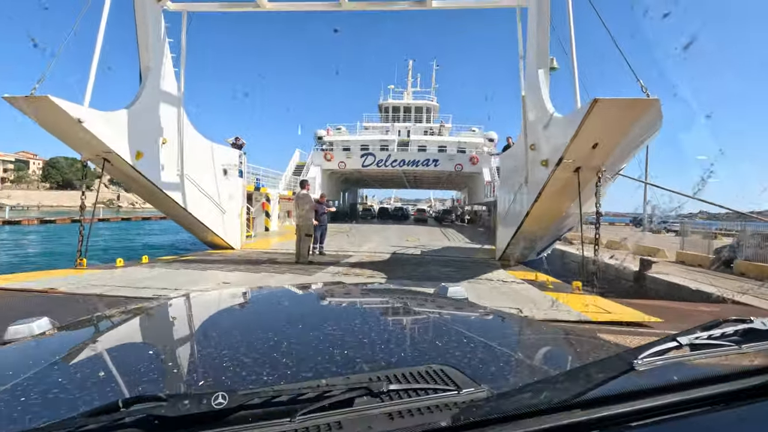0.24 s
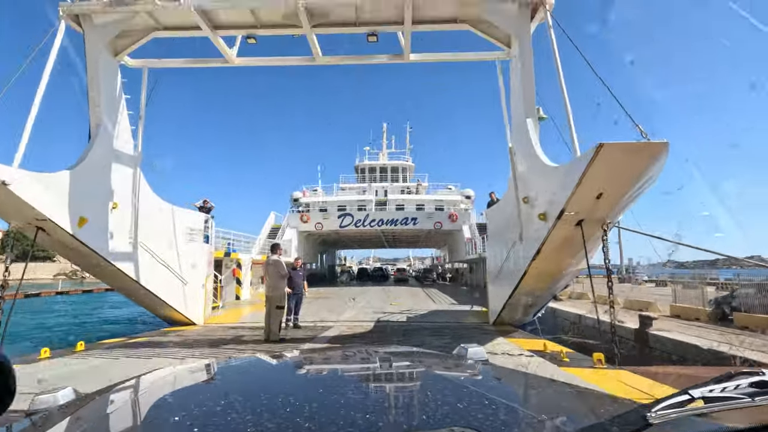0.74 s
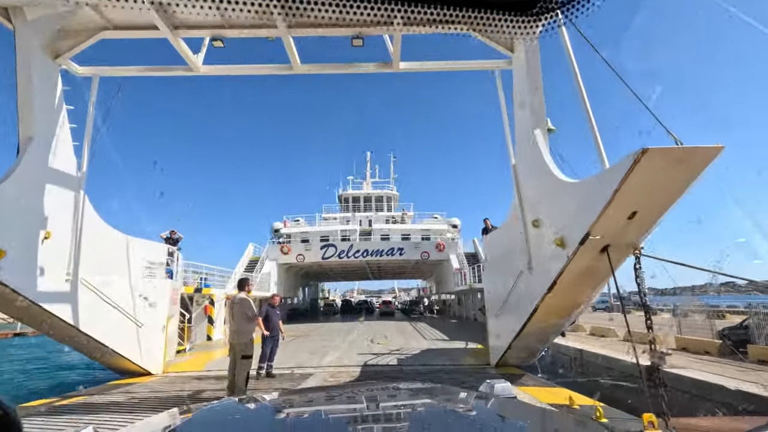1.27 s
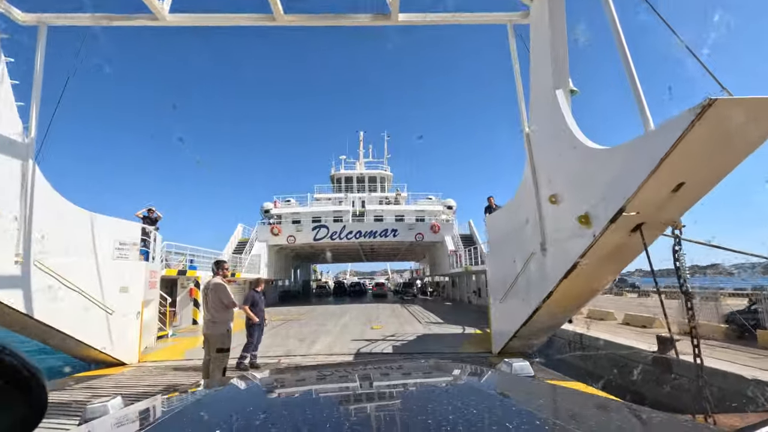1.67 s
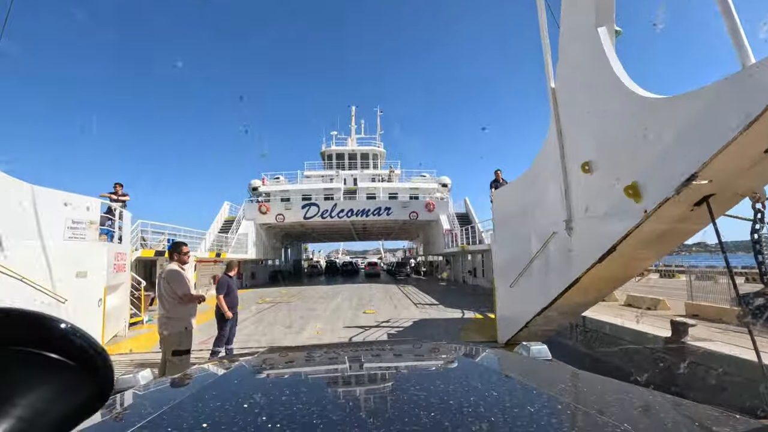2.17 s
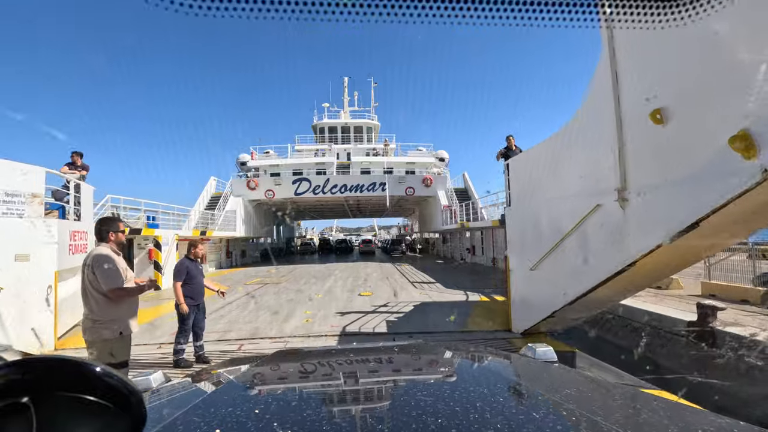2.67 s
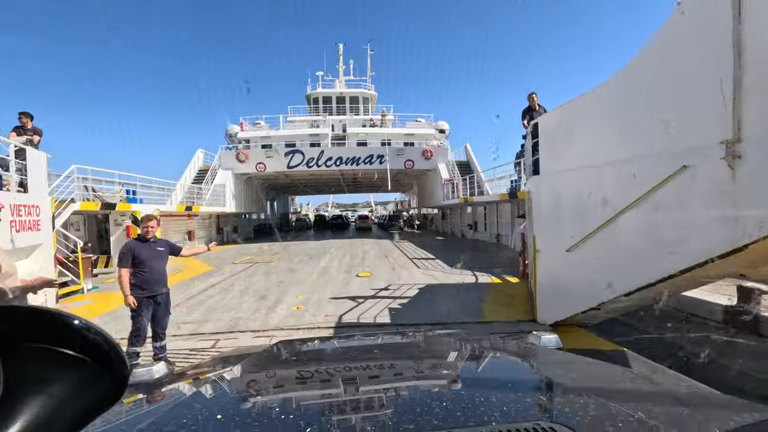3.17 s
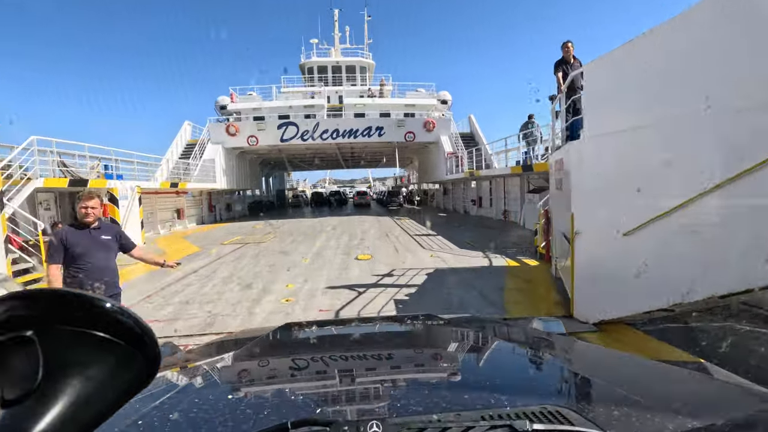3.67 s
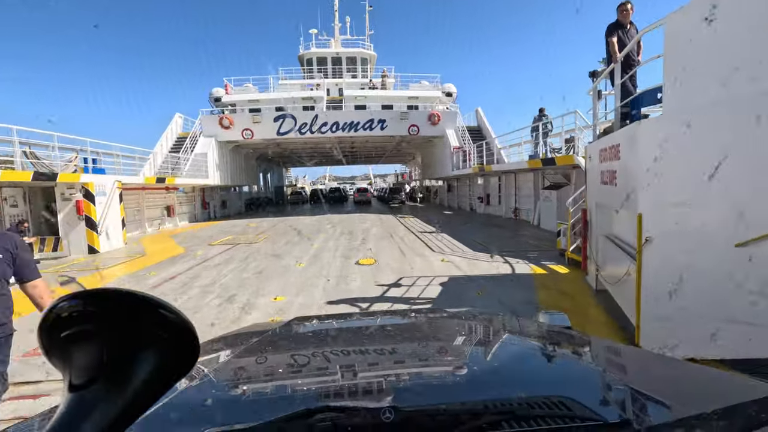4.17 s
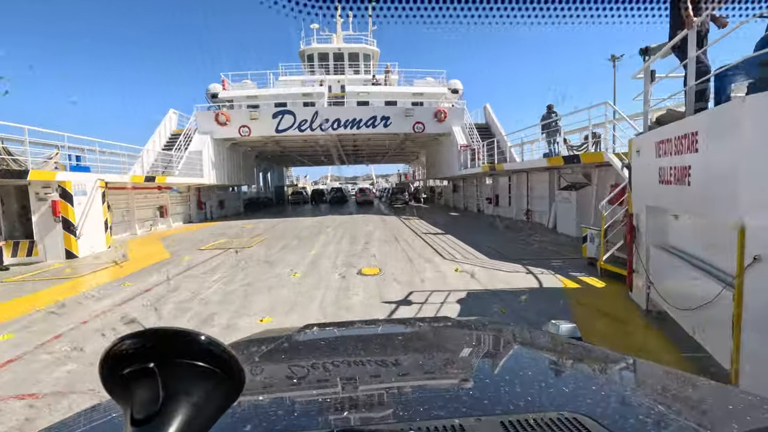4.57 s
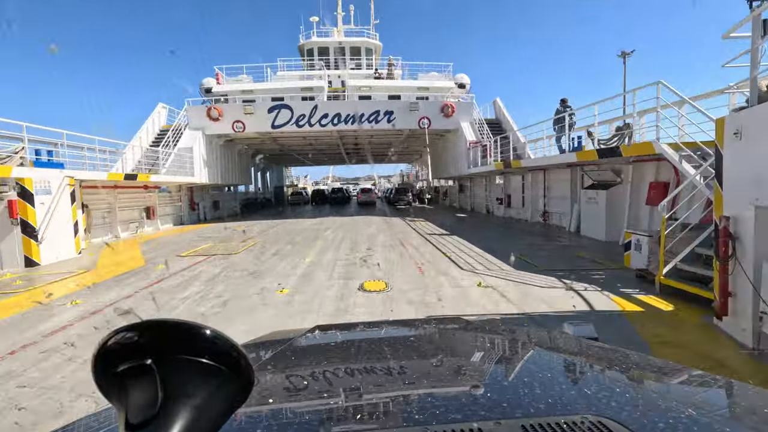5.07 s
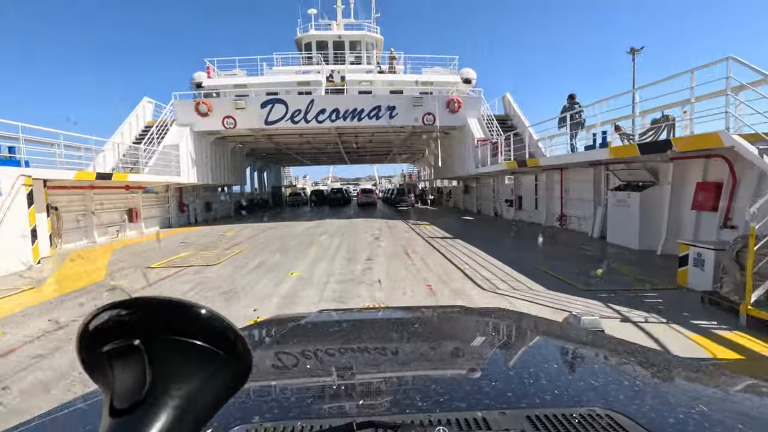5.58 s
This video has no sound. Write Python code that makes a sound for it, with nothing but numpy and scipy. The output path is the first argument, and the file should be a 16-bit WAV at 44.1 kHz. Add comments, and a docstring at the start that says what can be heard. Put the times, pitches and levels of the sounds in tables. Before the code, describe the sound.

Inside a large car at crawling speed, a deep, smooth eight-cylinder drone wavers, with a muffled rapid knock from behind the dashboard, faint tyre and fan hiss and low harbour hum. Small plastic clicks and dull thuds come at 0.2-1 s. The engine dips near 1.5 s, then surges around 2 s as the wheels meet the steel ramp: a hard boom at 2.1 s, then a tumble of bangs to 2.55 s. Engine falls towards idle by 2.8 s while thin metal sings and a loose flap lightly clanks. The heaviest, booming double bang hits at 3.3-3.4 s; bright ringing flap clanks and a high chain ping follow at 3.6 s, fading by 4.1 s. Fast, nearly even gritty ticking, with short high tones, swells at 4.5-5 s. A deck bang at 5.1 s brings rattles and a mid-pitched groan peaking at 5.3 s. Idle knocking and ship's engine hum remain, the latter rising slightly.

```python
"""First the drone and pump knock of an eight-cylinder car, heard from behind its windscreen.
It surges up a steel ramp onto a ferry deck and drops to idle: summed sine orders, noise raps on a bulkhead.
Plates bang and shudder, a loose flap clanks, trim clicks: noise bursts through resonances.
A nearly even ticking mixes grit with short tones; filtered noise makes the tyre and fan hiss and the
harbour hum; the ferry's engine is two wavering sine overtones that rise slightly in pitch late on."""
import sys
import numpy as np
from scipy import signal
from scipy.fft import rfft, irfft, next_fast_len
from scipy.io import wavfile
from scipy.ndimage import map_coordinates

SR = 44100
rng = np.random.default_rng(int(sys.argv[2]) if len(sys.argv) > 2 else 0)


def int16_out(signal):
    """Quantize to a 16-bit WAV file."""
    q = np.round(np.clip(np.atleast_2d(signal).T, -1, 1) * 32767)
    wavfile.write(sys.argv[1], SR, q.astype(np.int16))


N = 256750  # samples


def amp(db):
    """Gain of a level in dB."""
    return 10 ** (np.asarray(db) / 20)


def unit(x):
    """x at rms 1."""
    return x / np.sqrt(np.mean(x ** 2) + 1e-20)


def along(points, hz):
    """(frequency [Hz], value) points read on a log frequency axis."""
    f, v = np.transpose(points)
    return np.interp(np.log(hz + 1), np.log(f + 1), v)


def curves(rows):
    """One value per sample for each column after the time."""
    s, *cols = np.transpose(rows)
    return [np.interp(np.arange(N) / SR, s, c) for c in cols]


def wobble(rate):
    """A smooth random curve, rate knots a second."""
    knots = rng.standard_normal(int(N * rate / SR) + 4)
    return map_coordinates(knots, [np.arange(N) * rate / SR])


def filtered(x, response):
    """x times a complex response of frequency."""
    m = next_fast_len(N + SR // 2)
    spectrum = rfft(x, m) * response(np.fft.rfftfreq(m, 1 / SR))
    return irfft(spectrum, m)[..., :N]


def ringing(x, modes):
    """x through resonances of alternating sign, scaled so that white noise keeps its rms."""
    def body(f):
        """Sum of band-pass modes, each peaking at its centre."""
        return sum((-1) ** k * amp(db) * 1j * f * width / (centre ** 2 - f * f + 1j * f * width)
                   for k, (centre, width, db) in enumerate(modes))

    body_rms = np.sqrt(np.mean(np.abs(body(np.arange(SR // 2))) ** 2))
    return filtered(x, body) / body_rms


def bursts(times, dbs, t60s, attack, push_db=16.0):
    """Noise that starts just before each peak with a hard push and dies away."""
    power, push, t = np.zeros(N + SR), np.zeros(N), np.arange(2 * SR // 3) / SR
    for s, db, t60 in np.broadcast(times, dbs, t60s):
        envelope = amp(db - 60 * t / max(t60, .01)) * (1 - np.exp(-t / attack))
        power[round((s - .005) * SR):][:len(t)] += envelope ** 2
        push[round((s - .002) * SR)] = amp(db + push_db)  # a single sample
    clatter = amp(0.88 * wobble(90))  # many small rebounds inside each blow
    return np.sqrt(power[:N]) * clatter * rng.standard_normal(N) + push


def rush(spectrum, flutter_db):
    """Noise of a given colour whose level flutters at two speeds, at rms 1."""
    x = filtered(rng.standard_normal(N), lambda hz: amp(along(spectrum, hz)))
    return unit(x * amp(flutter_db * (wobble(13) + 0.79 * wobble(53))))


# tyre and fan hiss: (time [s], level [dB])
HISS_LEVEL = [(0, -47.5), (.15, -53.5), (.95, -54.5), (1.7, -56.5), (2.5, -56), (3.2, -52.5), (3.6, -47.5),
              (4.3, -53.5), (4.5, -45.5), (5.07, -48), (5.46, -56), (5.82, -50)]
# colour of the hiss: (frequency [Hz], relative level [dB])
HISS_COLOUR = [(350, -40.5), (600, 1.5), (710, -1.5), (932, -13), (1020, -3.5), (1150, -8), (1780, -11.5),
               (1950, -12), (3450, -15), (7600, -33.5), (9350, -66), (11500, -37), (13300, -69.5)]
# harbour hum, louder on board: (time [s], level [dB])
HUM_LEVEL = [(0, -35), (1, -40), (2, -38.5), (3, -35.5), (4, -34), (4.7, -35), (5.82, -31.5)]
# colour of the hum: (frequency [Hz], relative level [dB])
HUM_COLOUR = [(12, -39), (20, -19.5), (107, 2.5), (189, 2.5), (236, 6), (368, -8), (510, -26.5),
              (584, -43.5), (670, -32), (882, -34), (1200, -23), (1560, -46.5), (2640, -120)]


def background():
    """Two fluttering coloured noises: tyre and fan hiss over the low hum of the harbour."""
    (hiss_db,), (hum_db,) = curves(HISS_LEVEL), curves(HUM_LEVEL)
    hiss = amp(hiss_db) * rush(HISS_COLOUR, flutter_db=0.7)
    hum = amp(hum_db) * rush(HUM_COLOUR, flutter_db=1.6)
    return hiss + hum


# ship's engine: (time [s], firing rate [1/s], level of each overtone before its wobble [dB])
FERRY_ENGINE = [(0, 39.3, -48), (2.6, 39.3, -44), (3, 39.3, -38), (4.3, 39.4, -38), (4.9, 40.4, -39),
                (5.82, 41.3, -41)]


def ferry():
    """Overtones two and three of the ship's firing rate hum through the hull."""
    rate, db = curves(FERRY_ENGINE)
    turns = np.cumsum(rate) / SR
    return sum(amp(db + 1.8 * wobble(6.8)) * np.sin(2 * np.pi * (k * turns + rng.random()))
               for k in (2, 3))


# small clicks of loose trim: (time [s], level [dB])
TRIM_CLICKS = [(0.177, -39.5), (0.3076, -40), (0.4165, -41), (0.8094, -48.5), (0.9534, -44), (1.5178, -46),
               (1.551, -45.5), (2.9294, -48.5), (5.6485, -53)]
# dull knocks behind the dashboard: (time [s], level [dB])
DASH_THUDS = [(.36, -30), (.385, -31), (.935, -28.5)]
# dashboard resonances: (frequency [Hz], width [Hz], relative level [dB])
DASH_MODES = [(380, 63, -9), (520, 86, 4.5), (760, 110, 4.5), (1000, 200, -4)]


def trim():
    """Short bursts excite broad plastic modes for clicks and lower dashboard modes for knocks."""
    clicks = bursts(*np.transpose(TRIM_CLICKS), 0.12, 0.0024)
    thuds = bursts(*np.transpose(DASH_THUDS), 0.11, 0.0026)
    plastic = [(1500, 210, -3.5), (3000, 1800, -9), (5540, 2000, -20.5)]
    return ringing(clicks, plastic) + ringing(thuds, DASH_MODES)


# ticking that swells on board, before scatter:
# (time [s], grit level [dB], low tone level [dB], high tone level [dB])
TICK_LEVELS = [(3.6, -60, -70, -70), (3.75, -48, -70, -70), (4.35, -52, -70, -52), (4.5, -42, -55, -32),
               (4.64, -40, -42, -29), (4.68, -37, -27, -33), (5.04, -39, -29, -35), (5.15, -46, -60, -60),
               (5.82, -48, -70, -70)]
# grit resonances: (frequency [Hz], width [Hz], relative level [dB])
GRIT_MODES = [(990, 180, 1), (1740, 720, -0.5), (2670, 630, 1), (4130, 400, -2.5), (5400, 1000, -5.5),
              (6360, 920, -7.5), (10500, 6900, -13.5)]
TICK_S, TICK_RATE, TICK_GAINS = 4.7943, 16.9, .6  # a tick here [s], ticks/s there, rise [ticks/s per s]
LOW_HZ, HIGH_HZ = 1450, 2200  # middle pitches of the two tones
LOW_T60_S, HIGH_T60_S = .035, .06
HIGH_LATE_S, TICK_SCATTER_DB = .017, 2.4


def ticks():
    """Each tick spits a little grit and rings briefly on a low tone, then on a high one."""
    late = np.arange(N) / SR - TICK_S
    count = np.floor(TICK_RATE * late + TICK_GAINS * late ** 2 / 2)
    at = np.flatnonzero(np.diff(count))
    at = at[at > TICK_LEVELS[0][0] * SR]
    chance = rng.standard_normal((len(at), 7))
    levels = np.array(curves(TICK_LEVELS))[:, at]
    grit_db, low_db, high_db = levels + TICK_SCATTER_DB * chance[:, :3].T
    starts = np.r_[at / SR, at / SR + HIGH_LATE_S]
    starts = starts + .002 * chance[:, 5:].T.ravel()  # not quite even
    grit = ringing(bursts(starts, np.r_[grit_db, grit_db - 2], 0.1, 0.0021), GRIT_MODES)

    tones, t = np.zeros(N + SR), np.arange(SR // 10) / SR
    pitches = np.r_[LOW_HZ * (1 + .03 * chance[:, 3]), HIGH_HZ * (1 + .05 * chance[:, 4])]
    t60s = np.repeat([LOW_T60_S, HIGH_T60_S], len(at))
    for start, level, pitch, t60 in zip(starts, np.r_[low_db, high_db], pitches, t60s):
        envelope = amp(level - 60 * t / t60) * (1 - np.exp(-t / 0.00084))
        tones[round((start - .003) * SR):][:len(t)] += envelope * np.sin(2 * np.pi * pitch * t)
    return tones[:N] * amp(5 * wobble(400)) + grit  # each contact chatters


# uneven clanks of the loose flap: (time [s], level [dB])
FLAP_CLANKS = [(2.6274, -46), (2.6803, -44), (2.83, -32), (3.0603, -32), (3.106, -33), (3.2135, -33),
               (3.5833, -17), (3.674, -20.5), (3.7808, -23.5), (3.905, -28), (4.0852, -40), (4.131, -38)]
# flap resonances: (frequency [Hz], width [Hz], relative level [dB])
FLAP_BODY = [(1140, 37, -28), (1430, 35, 0.5), (1594, 33, 6.5), (1694, 42, 8.5), (2020, 56, 6.5),
             (1950, 48, -3), (2300, 12, 6), (2542, 15, -1), (2800, 71, -24.5)]
# a chain link pings: (time [s], level [dB], t60 [s])
CHAIN_LINK = [(3.33, -41, .5), (3.585, -32, .22)]
FLAP_T60_S, FLAP_T60_PER_DB = .27, .01  # of a -20 dB clank [s]; harder ones ring longer [s per dB]


def flap():
    """Noise bursts ring the flap's modes as it clanks on the plate; its chain pings higher up."""
    s, db = np.transpose(FLAP_CLANKS)
    t60 = FLAP_T60_S + FLAP_T60_PER_DB * (db + 20)
    link = ringing(bursts(*np.transpose(CHAIN_LINK), 0.0018), [(4270, 67, -38), (4986, 10, 9)])
    clanks = bursts(s, db, t60, 0.003)
    return link + ringing(clanks, FLAP_BODY)


# middle plate resonances: (frequency [Hz], width [Hz], relative level [dB])
CLANG_MODES = [(940, 150, -0.5), (1208, 55, 4), (1540, 200, -4), (1732, 25, 2), (1852, 50, -2),
               (2104, 57, 0.5), (2143, 140, -4), (2876, 310, -10), (2995, 10, -0.5), (3280, 320, -15.5)]
# high plate resonances: (frequency [Hz], width [Hz], relative level [dB])
PING_MODES = [(2550, 350, 6), (3800, 200, 3), (4190, 120, 4.5), (4600, 160, -2.5), (4690, 84, 4.5),
              (5000, 750, -5), (5430, 160, -2), (6020, 1200, -12), (7050, 540, -15.5), (11000, 2200, -36.5)]
BOOM_PUSH_DB = 29.5  # the first thump of a blow over its rumble


def plate(blows, boom_modes, low_shake, high_shake):
    """Each blow sets the low, middle and high modes going; shaking feeds the low and middle."""
    s, boom_db, clang_db, ping_db, t60 = np.transpose(blows)
    low = bursts(s, boom_db, 1.23 * t60, 0.0076, push_db=BOOM_PUSH_DB) + low_shake
    mid = bursts(s, clang_db, t60, 0.0042) + high_shake
    high = bursts(s, ping_db, 1.13 * t60, 0.0031)
    return ringing(low, boom_modes) + ringing(mid, CLANG_MODES) + ringing(high, PING_MODES)


SHUDDER_RISE_DB_S = 130.5


def swells(times, dbs, fades, rest_db):
    """Gain of loads that rise fast to a peak and fade, over a resting level."""
    late = np.arange(N) / SR - times[:, None]
    slope = np.where(late > 0, fades[:, None], -SHUDDER_RISE_DB_S)
    db = dbs[:, None] - slope * late
    return np.sqrt(np.sum(amp(db) ** 2, axis=0) + amp(rest_db) ** 2)


# blows of the steel plates:
# (time [s], boom level [dB], clang level [dB], ping level [dB], t60 of the clang [s])
PLATE_BLOWS = [(1.9827, -31.5, -26.5, -39, 0.071), (2.029, -50.5, -36, -39.5, 0.33),
               (2.0812, -14, -19.5, -31.5, 0.33), (2.132, -22, -23.5, -46.5, .47),
               (2.2956, -25, -30.5, -37.5, 0.5), (2.3136, -22.5, -26.5, -33.5, 0.34),
               (2.336, -22.5, -31, -49, 1), (2.401, -23.5, -28.5, -34.5, 0.21),
               (2.4586, -46, -54, -47, 0.92), (2.5324, -25.5, -30, -39, 0.19),
               (2.5507, -26, -41, -50, 0.69), (3.3099, -17, -27.5, -39.5, 0.33),
               (3.3282, -3.5, -12, -27, 0.44), (3.3963, -10.5, -18.5, -36, 0.65),
               (3.5835, -14, -30, -22.5, 0.23), (3.681, -22, -41, -42, 0.48),
               (5.0795, -18, -17.5, -28.5, 0.44), (5.1918, -27, -30.5, -43.5, 0.28),
               (5.2737, -45, -41, -40, 0.46), (5.3074, -39, -25, -36.5, 0.29), (5.334, -33, -22, -35, .52),
               (5.3794, -21.5, -25.5, -37, 0.29), (5.4494, -29, -30, -68, 0.11),
               (5.5167, -56, -45, -60, 0.15)]
# ramp's low resonances: (frequency [Hz], width [Hz], relative level [dB])
RAMP_BOOM_MODES = [(138, 64, -11), (229, 26.4, -0.5), (267, 11.3, 5), (287.2, 18, 1.5), (332.5, 30, -1),
                   (390.4, 38, -1.5), (422.3, 40, -5), (488.3, 15, -2), (553.7, 20, -4.5), (680.6, 40, -10),
                   (835, 47, -15.5)]
# deck's low resonances: (frequency [Hz], width [Hz], relative level [dB])
DECK_BOOM_MODES = [(196, 6.8, 3.5), (271.6, 48.5, 3), (295.7, 66, 0), (390, 60, -6), (477, 18, -1.5),
                   (554, 32, -5.5), (666, 51, -6), (806, 27, -6.5)]
# plates shudder as a wheel loads them: (peak time [s], low level [dB], high level [dB], fade [dB/s])
PLATE_SHUDDER = [(2.17, -25.5, -52, 23.5), (2.46, -30.5, -37.5, 27), (2.82, -33, -48, 18.5),
                 (3.48, -43, -45, 115), (3.56, -21, -39, 51), (3.67, -16, -30, 57), (4.64, -32.5, -42, 20),
                 (5.12, -18, -31.5, 64), (5.3, -23.5, -31, 38.5)]
# thin parts of the ramp sing on: (time [s], level [dB])
SINGING_LEVEL = [(2, -77), (2.15, -45), (2.8, -38.5), (3.3, -43), (3.9, -59), (4.15, -46.5), (5, -58)]
# their resonances: (frequency [Hz], width [Hz], relative level [dB])
THIN_MODES = [(711, 37, 4), (1188, 35, 0), (1160, 4.9, -3.5), (1422, 38, -0.5), (1598, 5.4, -8.5),
              (1630, 12, -1), (1986, 10, -15)]
# the loaded deck plate groans: (time [s], level [dB])
GROAN_LEVEL = [(5.05, -73), (5.1, -48), (5.2, -31), (5.29, -19.5), (5.5, -30), (5.58, -68)]
RAMP_S, DECK_S = 1.9, 4.4  # the wheels reach the ramp, then the deck
REST_LOW_DB, REST_HIGH_DB = -38, -52.5  # shudder between peaks


def ramp():
    """Ramp and deck modes ring to blows, then to noise that swells while the wheels load them."""
    t = np.arange(N) / SR
    s, low_db, high_db, fade = np.transpose(PLATE_SHUDDER)
    low = swells(s, low_db, fade, REST_LOW_DB) * rng.standard_normal(N)
    rattle_gain = amp(2.5 * wobble(35) + 2 * wobble(150))  # loose plates rattle unevenly
    rattle = unit(rattle_gain * rng.standard_normal(N))
    high = swells(s, high_db, fade, REST_HIGH_DB) * rattle
    on_deck = t > DECK_S
    on_ramp = (t > RAMP_S) & ~on_deck

    (singing_db,), (groan_db,) = curves(SINGING_LEVEL), curves(GROAN_LEVEL)
    singing = ringing(amp(singing_db) * rng.standard_normal(N), THIN_MODES)
    groan = ringing(amp(groan_db) * rng.standard_normal(N), [(482.8, 8.6, -0.89), (510, 11, -1.1)])

    ramp_blows = [b for b in PLATE_BLOWS if b[0] < DECK_S]
    deck_blows = [b for b in PLATE_BLOWS if b[0] > DECK_S]
    ramp_plate = plate(ramp_blows, RAMP_BOOM_MODES, low * on_ramp, high * on_ramp)
    deck_plate = plate(deck_blows, DECK_BOOM_MODES, low * on_deck, high * on_deck)
    return ramp_plate + deck_plate + singing + groan


# engine speed, surging as the wheels climb, then idle: (time [s], working cycles per second [1/s])
ENGINE_SPEED = [(0, 10.24), (.2, 9.38), (.375, 9.05), (.6, 9.48), (.875, 10.17), (1, 9.83), (1.19, 8.7),
                (1.5, 7.9), (1.75, 8.27), (2, 10.14), (2.125, 10.41), (2.5, 7.64), (2.625, 8.1),
                (2.83, 6.2), (3, 6.5), (3.4, 5.95), (5.82, 5.95)]
# clean tones of the engine: (multiple of the cycle [1], relative level [dB])
ENGINE_ORDERS = [(3, -18), (5, -20), (6, -1), (7, -12), (8, 0), (9, -12), (10, 3), (11, 2), (12, -14),
                 (13, -1), (14, -2), (16, -8), (17, -12), (18, -10), (19, -13), (21, -6), (24, -1),
                 (26, -12), (27, -9)]
# how the cabin carries them: (frequency [Hz], gain [dB])
CABIN_GAIN = [(25, -6), (36, 0), (46, -8), (60, -4), (80, 0), (91, -14), (100, -7), (110, 0), (130, -1),
              (160, -3), (190, -8), (235, 0), (280, 0)]
# fuel pump knock: (time [s], level [dB])
KNOCK_LEVEL = [(0, -36), (.45, -37.5), (.7, -42), (1.1, -40), (1.6, -46.5), (2.15, -43.5), (2.7, -56),
               (3.6, -51), (4.3, -44), (5.82, -41.5)]
# knock of each lobe of the fuel pump, before scatter: (relative level [dB]) in turn
PUMP_LOBES = [0, -3, -1.9]
# bulkhead resonances: (frequency [Hz], width [Hz], relative level [dB])
BULKHEAD_MODES = [(235, 48, -8), (368, 17, -8.5), (528.3, 23.4, 0.5), (736, 46, -12.5), (800, 110, -16),
                  (1017, 9.1, -11.5)]
IDLE = 5.95  # working cycles a second
# the drone grows with speed over idle, levelling off past the knee (cycles a second)
DRONE_IDLE_DB, DRONE_GROWS_DB, DRONE_KNEE = -42.5, 13, 2.36


def engine():
    """Clean orders drone in the cabin; the pump raps the bulkhead three times a cycle."""
    (speed,), (knock_db,) = curves(ENGINE_SPEED), curves(KNOCK_LEVEL)
    drone_db = DRONE_IDLE_DB + DRONE_GROWS_DB * np.tanh((speed - IDLE) / DRONE_KNEE)
    turns = np.cumsum(speed) / SR
    drone = np.zeros(N)
    for k, db in ENGINE_ORDERS:
        order_db = db + along(CABIN_GAIN, k * speed) + 0.94 * wobble(4.3)
        drone += amp(order_db) * np.sin(2 * np.pi * (k * turns + rng.random()))

    lobes = len(PUMP_LOBES)
    stroke = turns * lobes + .68 + .05 * wobble(15)  # the strokes fall a little unevenly
    number = stroke.astype(int)
    scatter_db = rng.uniform(-5, 3, number[-1] + 1)
    size = amp(np.take(PUMP_LOBES, number % lobes) + scatter_db[number])
    since = (stroke - number) / (speed * lobes)  # seconds after the last stroke
    thump = 2 * np.exp(-since / 0.0011)
    rasp_gain = np.exp(-since / 0.011) - np.exp(-since / 0.00046) + 0.2
    rap = thump + rasp_gain * rng.standard_normal(N)
    muffled = filtered(size * rap, lambda hz: 1 / (1 + 1j * hz / 1300) ** 2)  # felt behind the dashboard
    knock = unit(ringing(muffled, BULKHEAD_MODES))
    return amp(drone_db) * drone + amp(knock_db) * knock


# tone colour of the bangs, clanks, ticks and clicks, dull treble, hollow near 9 kHz:
# (frequency [Hz], gain [dB])
KNOCK_COLOUR = [(100, -6), (5000, -7), (7500, -6), (8500, -14), (9200, -26.5), (10000, -16), (12000, -20),
                (13400, -18.5)]


def scene():
    """Bangs, clanks, ticks and clicks share one tone colour; all meet at the one microphone."""
    knocks = ramp() + flap() + ticks() + trim()
    coloured = filtered(knocks, lambda hz: amp(along(KNOCK_COLOUR, hz)))
    return (engine() + ferry() + coloured + background())[None]


TOP_HZ = 13400


def record(dry):
    """The microphone signal fades in and out very briefly and keeps nothing above its band limit."""
    return filtered(dry * signal.windows.tukey(N, .003), lambda hz: hz < TOP_HZ)


dry = scene()
out = record(dry)
int16_out(out)
```